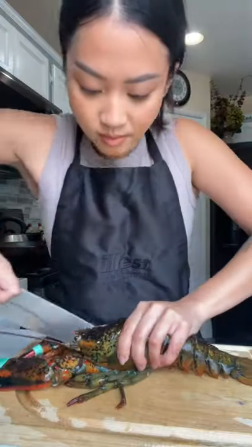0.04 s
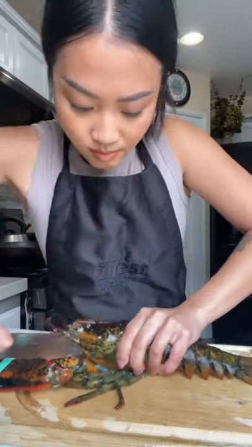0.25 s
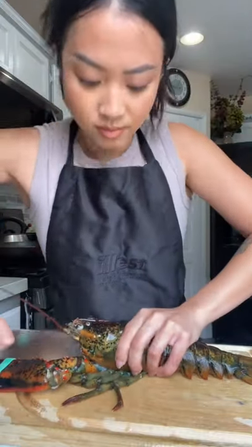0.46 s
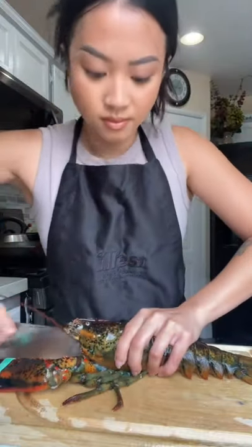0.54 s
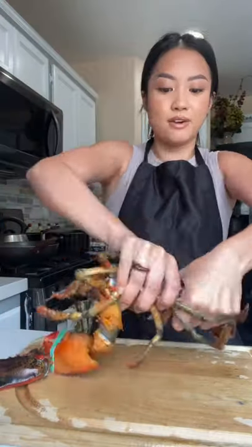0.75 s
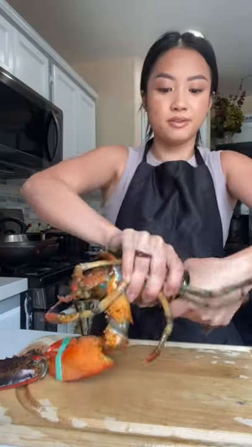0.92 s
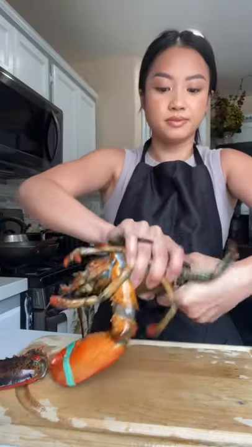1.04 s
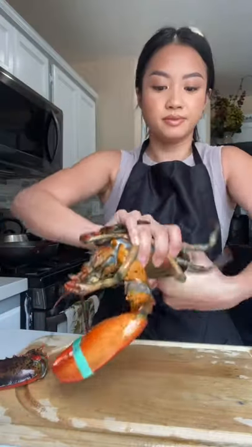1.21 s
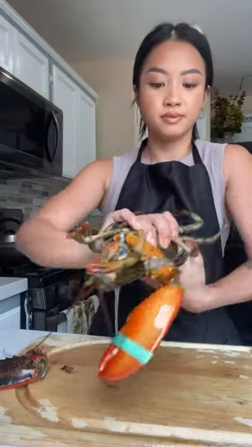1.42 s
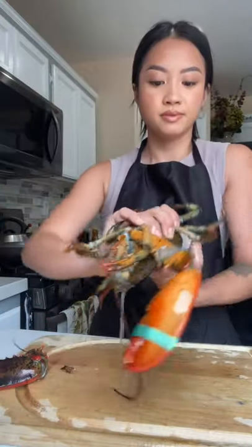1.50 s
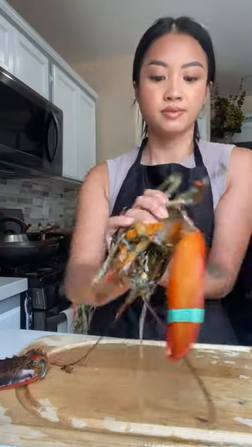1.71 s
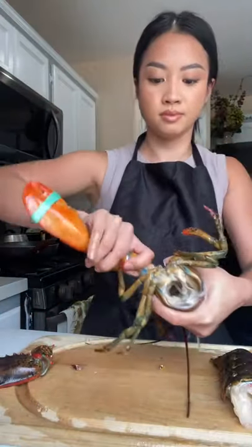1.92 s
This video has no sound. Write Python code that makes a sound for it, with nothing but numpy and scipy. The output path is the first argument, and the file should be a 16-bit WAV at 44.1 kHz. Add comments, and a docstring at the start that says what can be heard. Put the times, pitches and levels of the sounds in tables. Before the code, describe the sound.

A lobster's shell crunches wetly under a knife from about 0.1 seconds, with deep thuds on a wooden board until 0.6. At 0.8 a claw knocks on the board and the tail starts twisting off with snaps and wet crackling, sharpest just after 1 second and fading by 1.7. A tiny tick follows near 1.85. It is all close, in a small ringing kitchen with a faint appliance hum.

```python
"""A wet crunch, close up: a chef's knife goes through a lobster's shell and thuds into a wooden board
on a kitchen counter. A claw knocks on the board, then the tail is twisted off: the shell creaks, its
plates snap over the hollow body and the flesh crackles wetly, with one small tick at the end.
Heard from close by on a phone's two microphones, the cracks a little to the left, in a small hard
kitchen that rings after each hit, over a low appliance hum."""
import sys
import numpy as np
from scipy import signal
from scipy.fft import rfft, irfft
from scipy.io import wavfile
from scipy.ndimage import map_coordinates

SR = 44100
rng = np.random.default_rng(int(sys.argv[2]) if len(sys.argv) > 2 else 0)


def waveform_to_disk(signal):
    """Save audio, clipped to [-1, 1], as 16-bit WAV at the path in sys.argv[1]."""
    frames = np.transpose(np.atleast_2d(signal))
    scaled = np.clip(frames, -1, 1) * 32767
    samples = np.round(scaled).astype(np.int16)
    wavfile.write(sys.argv[1], SR, samples)


N = 85995

# air of the kitchen: frequency_hz, gain_db
ROOM_COLOUR = [(20, -30), (42, -17.5), (68, 5), (100, -8.5), (170, -6.5), (250, -13.5), (380, -10),
               (700, -33.5), (1400, -29), (2600, -24.5), (5000, -33), (10000, -38.5), (13000, -48.5)]
# flesh and shell rubbing and tearing: start_s, hold_s, level_db, grains_per_s
FLESH_TEARS = [(0.0, 0.3, -54, 1700), (0.107, 0.11, -44, 700), (0.244, 0.039, -32.5, 610),
               (0.349, 0.2, -51.5, 560), (0.568, 0.6, -63.5, 2100), (0.797, 0.13, -44.5, 680),
               (0.973, 0.019, -40, 1130), (1.055, 0.067, -40.5, 400), (1.264, 0.0093, -54, 490),
               (1.303, 0.21, -53.5, 303), (1.469, 0.18, -58.5, 154)]
# tone of the wet crackle: frequency_hz, gain_db
FLESH_COLOUR = [(150, -2.5), (450, 3), (900, -3), (1400, 1.5), (1950, 0), (2650, 11.5), (3400, -9),
                (5000, -13.5), (8000, -6.5), (11000, -9), (13500, -29.5)]
# pushes that shake the counter: start_s, level_db, firmness_hz
COUNTER_PUSHES = [(0.014, -42, 195), (0.1284, -22, 176), (0.1704, -21.5, 138), (0.2426, -9, 160),
                  (0.2618, -11.5, 92), (0.3146, -20, 171), (0.3959, -11.5, 62), (0.5504, -10, 55.2),
                  (0.6086, -15.5, 53.6), (0.805, -39, 202), (0.822, -30.5, 172), (0.884, -36, 207)]
# resonances of the counter: pitch_hz, level_db, t60_s
COUNTER_MODES = [(72.5, -10, 0.4), (92.1, 4.5, 0.16), (107.12, -1, 0.44), (132.2, 3, 0.16),
                 (148.8, -11, 0.39), (188, -4.5, 0.22), (283, 2, 0.29), (442, -21, .2)]
# knife breaking the shell: start_s, crumble_s, board_db, hollow_db, splinter_db
KNIFE_BREAKS = [(0.11, 0.0046, -39, -44.5, -38), (0.122, 0.0049, -36, -31.5, -30),
                (0.144, 0.0077, -40, -43, -40.5), (0.159, 0.0036, -45.5, -42.5, -51),
                (0.187, 0.0055, -52, -41, -52), (0.209, 0.0034, -33, -29.5, -31),
                (0.2141, 0.0013, -30, -37.5, -34.5), (0.2185, 0.00024, -37, -19, -34.5),
                (0.2295, 0.0015, -21, -18, -19.5), (0.2343, 0.0013, -28, -19.5, -28),
                (0.238, 0.0015, -29.5, -37, -23), (.2418, 0.0031, -16, -25, -24),
                (0.276, 0.0023, -32.5, -46.5, -31.5), (0.3165, 0.0014, -22.5, -27.5, -46),
                (0.402, 0.0028, -32, -40.5, -37.5), (0.481, 0.0023, -48, -52.5, -46),
                (0.532, 0.0016, -35, -35.5, -39), (0.5542, 0.0038, -36, -50, -44)]
# tone of the board under the blade: frequency_hz, gain_db
BOARD_COLOUR = [(80, -15.5), (170, 1.5), (300, 4), (520, 5.5), (700, 3), (1000, -19.5), (2000, -34),
                (6000, -44.5)]
# tone of shell splintering at the blade: frequency_hz, gain_db
SPLINTER_COLOUR = [(500, -31), (1500, -22), (2600, 3), (3300, -0.5), (4000, 6.5), (5500, -1.5),
                   (8000, -1.5), (10800, -2), (13000, -16)]
# shell giving way in the hands: start_s, crumble_s, body_db, pitch_hz, snap_db, chip_db
SHELL_SNAPS = [(0.762, 0.0064, -48.5, 4540, -50, -49.5), (.7885, 0.0084, -34.5, 2900, -42.5, -42),
               (0.803, 0.0013, -31.5, 2540, -32, -29), (0.8383, 0.0013, -33, 2420, -34, -48),
               (0.885, 0.0026, -36.5, 2800, -54, -43), (0.974, 0.0017, -45, 3030, -36.5, -39.5),
               (1.0212, 0.0018, -42, 2670, -28, -38.5), (1.0299, 0.0035, -45.5, 3490, -27.5, -37.5),
               (1.0416, 0.0029, -35, 4760, -25, -24.5), (1.0446, 0.0014, -36, 5030, -18.5, -27),
               (1.048, 0.0025, -47, 3280, -30, -38.5), (1.051, 0.00097, -46, 5050, -28, -40),
               (1.07, 0.0024, -45, 3110, -28.5, -48.5), (1.102, 0.0049, -35, 2630, -37, -34),
               (1.1364, 0.00051, -44, 3510, -33, -45), (1.2501, 0.0021, -47, 5400, -36.5, -28),
               (1.2599, 0.0055, -40, 2577, -29.5, -46.5), (1.264, 0.0098, -45.5, 3750, -32.5, -61),
               (1.284, 0.007, -45, 2480, -60, -46), (1.4065, 0.0047, -43.5, 2485, -40.5, -52),
               (1.491, 0.018, -53, 3040, -56, -48.5), (1.548, 0.01, -63, 3930, -57.5, -50.5),
               (1.58, 0.0025, -71, 2720, -57, -53), (1.627, .004, -59, 2520, -64.5, -66.5),
               (1.643, .003, -57, 3000, -64.5, -66.5), (1.653, .003, -52.5, 2880, -54.5, -59)]
# tone of a crack through the body: frequency_hz, gain_db
BODY_COLOUR = [(120, -28), (300, -1.5), (600, 2.5), (850, -6), (1300, 2), (1700, -3), (2500, -23),
               (6000, -32.5)]
# resonances of the hollow body: pitch_hz, level_db, t60_s
BODY_MODES = [(396, -9, 0.033), (600, -4, 0.045), (700, -7.5, .05), (1048, 3.5, .035), (1173, 6.5, 0.035),
              (1558, -5.5, .03), (2400, -12, 0.03), (2650, -0.5, 0.13)]
# large shell plate that rings with the snaps: pitch_hz, level_db, t60_s
PLATE_MODES = [(2700, 1, 0.08), (3210, -1.5, 0.079), (4620, -1, .05), (4740, 6.5, 0.1065),
               (5570, 1.5, 0.049), (6040, -13, 0.044), (7830, -5.5, .04)]
# tone of the chips off a snap: frequency_hz, gain_db
CHIP_COLOUR = [(800, -27.5), (2500, 0.5), (5000, 2.5), (7800, -6.5), (10000, -2.5), (12000, -9),
               (14000, -29.5)]
# claw landing and rattling: start_s, level_db
CLAW_KNOCKS = [(.7882, -26), (.7933, -23), (.8060, -25), (.8136, -28)]
# resonances of claw on board: pitch_hz, level_db, t60_s
CLAW_MODES = [(174.2, -11, 0.19), (402, -24, 0.28), (502, -4, 0.099), (657, -3.5, 0.077), (695, -4.5, 0.16),
              (782, 0, 0.075), (829, -4, 0.06), (1096, -13.5, .08), (1254, -4, 0.1), (1556, -20.5, .1),
              (2133, -21, .08)]
# reverberation of the kitchen: band_hz, t60_s, level_db
KITCHEN_BANDS = [(125, 1, -27.5), (500, 0.65, -8), (1300, 0.38, -8), (2800, 0.41, -8.5), (4940, 0.64, -12),
                 (9150, 0.22, -8.5), (13100, 0.2, -26.5)]

HIT_SAMPLES, LEAD_S = 4096, 0.006  # one fracture's buffer; time in it ahead of the break
TEAR_SPREAD_DB = 2.5  # unevenness of crackles and pops
SIDE_SIGNS = np.array([[1], [-1]])  # left, right


def amp(db):
    """Decibels to gain."""
    return 10 ** (np.asarray(db) / 20)


def add(out, start_s, x):
    """Mix x into out from start_s."""
    i = max(int(start_s * SR), 0)
    out[..., i:i + x.shape[-1]] += x[..., :N - i]


def at_level(x, db):
    """Give a short sound the energy of 5 ms at this level."""
    return x * amp(db) * np.sqrt(.005 * SR / (np.sum(x ** 2) + 1e-18))


def pan(x, left_db):
    """Place a sound so that it is left_db louder at the left microphone."""
    return x * amp(SIDE_SIGNS * left_db / 2)


def cut(x, hz, kind, order=2):
    """Low-pass or high-pass."""
    return signal.sosfilt(signal.butter(order, hz, kind, fs=SR, output="sos"), x)


def colour(x, points):
    """Minimum-phase filter through (frequency_hz, gain_db) points."""
    hz, db = np.array(points, float).T
    f = np.maximum(np.fft.rfftfreq(HIT_SAMPLES, 1 / SR), 1)
    cepstrum = irfft(np.log(amp(np.interp(np.log(f), np.log(hz), db))))
    cepstrum[1:HIT_SAMPLES // 2] *= 2
    cepstrum[HIT_SAMPLES // 2 + 1:] = 0
    return signal.fftconvolve(x, irfft(np.exp(rfft(cepstrum))))[:len(x)]


def ring(x, hz, stage_width_hz):
    """A shell resonance with steep skirts: two band-pass stages in a row."""
    b, a = signal.iirpeak(hz, hz / stage_width_hz, fs=SR)
    return signal.lfilter(b, a, signal.lfilter(b, a, x))


def decay(t, t60_s):
    """An envelope that falls 60 dB in t60_s."""
    return np.exp(-np.log(1000) * t / t60_s)


def modes(table, rise_s):
    """Decaying modes that swell over the time of contact."""
    t = np.arange(SR) / SR
    ringing = sum(amp(db) * np.sin(2 * np.pi * hz * t) * decay(t, t60) for hz, db, t60 in table)
    return ringing * (1 - np.exp(-t / rise_s))


def struck(x, table):
    """An object's modes set ringing by x."""
    return signal.fftconvolve(x, modes(table, 1 / SR)[:HIT_SAMPLES])[:HIT_SAMPLES]


def grains(per_s, size, spread_db):
    """Tiny fractures of uneven strength at random moments."""
    strengths = amp(spread_db * np.clip(rng.standard_normal(size), -2, 2))
    return (rng.random(size) < per_s / SR) * rng.standard_normal(size) * strengths


def room_tone(air_db=-59.5, hum_hz=62.7, hum_db=-65.5):
    """Faint air and a low appliance hum lie under the whole scene."""
    mid, side = (colour(rng.standard_normal(N + HIT_SAMPLES), ROOM_COLOUR)[HIT_SAMPLES:]
                 for _ in range(2))
    air = (mid + SIDE_SIGNS * cut(side, 500, "high")) / mid.std()
    hum = np.sqrt(2) * np.sin(2 * np.pi * hum_hz * np.arange(N) / SR)
    return air * amp(air_db) + hum * amp(hum_db)


def wet_pops(per_s, count=8, low_hz=1765, high_hz=6010, t60_s=0.013):
    """One second of wet pops at scattered pitches, each ringing briefly."""
    t = np.arange(HIT_SAMPLES) / SR
    pitches = low_hz * (high_hz / low_hz) ** ((np.arange(count) + rng.random(count)) / count)
    out = np.zeros(SR)
    for hz in pitches:
        pop = np.sin(2 * np.pi * hz * t) * decay(t, t60_s)
        out += signal.fftconvolve(grains(per_s / count, SR, TEAR_SPREAD_DB), pop)[:SR]
    return out


def tearing_flesh(pop_db=-2.5, rise_s=0.0024, fade_s=0.054):
    """Flesh and shell rub and tear with a fine crackle and wet pops."""
    out, t = np.zeros(N), np.arange(SR) / SR
    for start_s, hold_s, db, per_s in FLESH_TEARS:
        crackle = colour(grains(per_s, SR, TEAR_SPREAD_DB), FLESH_COLOUR)
        pops = wet_pops(per_s)
        tear = crackle / crackle.std() + amp(pop_db) * pops / pops.std()
        envelope = np.minimum(t / rise_s, 1) * np.exp(-np.maximum(t - hold_s, 0) / fade_s)
        add(out, start_s, tear / tear.std() * envelope * amp(db))
    return out


def counter_thuds():
    """The counter booms under each push; modes above the push's firmness stay quiet."""
    out = np.zeros(N)
    for start_s, db, firmness_hz in COUNTER_PUSHES:
        excited = [(hz, mode_db - 10 * np.log10(1 + (hz / firmness_hz) ** 8), t60)
                   for hz, mode_db, t60 in COUNTER_MODES]
        add(out, start_s, amp(db) * modes(excited, rise_s=0.0071))
    return out


def fracture(crumble_s, build_s=0.00094):
    """Crumbs gather, the shell breaks, and a shower of crumbs dies away."""
    t = np.arange(HIT_SAMPLES) / SR - LEAD_S
    envelope = np.exp(np.minimum(t / build_s, -t / crumble_s))
    crumbs = grains(per_s=4000, size=HIT_SAMPLES, spread_db=2) * envelope
    crumbs /= np.sqrt(np.sum(crumbs ** 2)) + 1e-12
    crumbs[int(LEAD_S * SR)] += 0.83  # the break itself
    return crumbs


def knife_crunch(hollow_hz=1311):
    """Each break under the blade knocks the board, throws splinters and rings the hollow shell."""
    out = np.zeros((2, N))
    for start_s, crumble_s, board_db, hollow_db, splinter_db in KNIFE_BREAKS:
        crack = at_level(colour(fracture(crumble_s), BOARD_COLOUR), board_db)
        crack += at_level(colour(fracture(crumble_s), SPLINTER_COLOUR), splinter_db)
        hollow = ring(fracture(crumble_s), hollow_hz, stage_width_hz=1168)
        hollow = at_level(cut(hollow, 1850, "low", order=4), hollow_db)
        add(out, start_s - LEAD_S, pan(crack, left_db=1.5) + pan(hollow, left_db=5.5))
    return out


def tail_twist(snap_top_hz=7160, snap_t60_s=0.033):
    """Shell plates snap and ring briefly, each at its own pitch, over the hollow body."""
    out = np.zeros(N)
    for start_s, crumble_s, body_db, hz, snap_db, chip_db in SHELL_SNAPS:
        body = at_level(colour(fracture(crumble_s), BODY_COLOUR), body_db)
        body += at_level(struck(fracture(crumble_s), BODY_MODES), body_db - 1.5)
        snap = ring(fracture(crumble_s), hz, stage_width_hz=0.76 * hz)
        snap = at_level(cut(snap, snap_top_hz, "low", order=4), snap_db)
        snap += at_level(struck(fracture(crumble_s), [(hz, 0, snap_t60_s)]), snap_db - 3)
        plate_db = snap_db - 7 + 0.28 * (snap_db + 6.5)  # soft snaps barely ring the large plate
        plate = at_level(struck(fracture(crumble_s), PLATE_MODES), plate_db)
        chips = at_level(colour(fracture(crumble_s), CHIP_COLOUR), chip_db)
        add(out, start_s - LEAD_S, body + snap + plate + chips)
    return out


def claw_knocks():
    """The claw lands on the board with a clonk and rattles."""
    out = np.zeros(N)
    for start_s, db in CLAW_KNOCKS:
        add(out, start_s, amp(db) * modes(CLAW_MODES, rise_s=0.0012))
    return out


def wet_tick(start_s=1.854, level_db=-46, pitch_hz=10070):
    """One last tiny fracture makes a high, wet tick."""
    out = np.zeros(N)
    tick = ring(fracture(crumble_s=0.0011), pitch_hz, stage_width_hz=3300)
    add(out, start_s - LEAD_S, at_level(tick, level_db))
    return out


def kitchen_reverb(x, early_db=-4, early_decay_s=0.0046, late_rise_s=0.0034):
    """Quick reflections off board and cupboards, then a diffuse tail; the bass stays centred."""
    t, f = np.arange(SR) / SR, np.maximum(np.fft.rfftfreq(SR, 1 / SR), 1)
    band_hz, t60_s, level_db = np.array(KITCHEN_BANDS).T
    envelope = np.exp(-t / early_decay_s) * (t > .0005)
    early = rng.standard_normal((2, SR)) * envelope / np.linalg.norm(envelope)
    response = cut(early, 850, "high") * amp(early_db)
    late_spectrum = rfft(rng.standard_normal((2, SR)))
    for k, share in enumerate(np.eye(len(band_hz))):
        band = irfft(late_spectrum * np.interp(np.log(f), np.log(band_hz), share))
        envelope = decay(t, t60_s[k]) * (1 - np.exp(-t / late_rise_s))
        response += band * envelope / np.linalg.norm(envelope) * amp(level_db[k])
    mid, side = signal.fftconvolve(x[None], response, axes=1)[:, :N]
    return (mid + SIDE_SIGNS * cut(side, 420, "high", order=3)) / np.sqrt(2)


def scene(left_lead_s=0.00015, mono_below_hz=250):
    """The cracks reach the left microphone first; thuds and knocks reach both at once."""
    left, right = knife_crunch() + pan(tail_twist() + wet_tick(), left_db=4) + tearing_flesh()
    boom = counter_thuds() + claw_knocks()
    right = map_coordinates(right, [np.arange(N) - left_lead_s * SR], order=5)
    side = cut((left - right) / 2, mono_below_hz, "high", order=1)
    direct = (left + right) / 2 + SIDE_SIGNS * side
    return direct + boom + kitchen_reverb(left + boom) + room_tone()


def record(dry, low_cut_hz=67, clip_level=0.85, top_hz=13400):
    """The phone drops the deepest bass, clips the very loudest peaks and cuts the top."""
    clipped = np.clip(cut(dry, low_cut_hz, "high"), -clip_level, clip_level)
    return signal.sosfilt(signal.ellip(8, .2, 70, top_hz, fs=SR, output="sos"), clipped)


dry = scene()
out = record(dry)
waveform_to_disk(out)
```